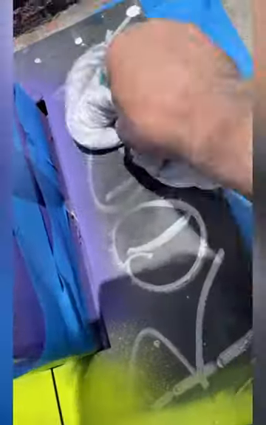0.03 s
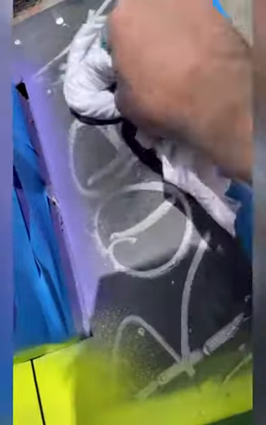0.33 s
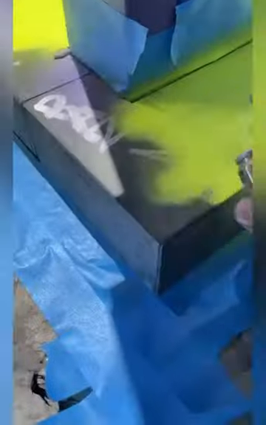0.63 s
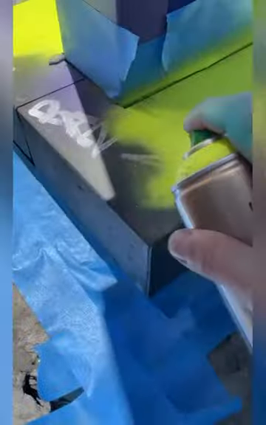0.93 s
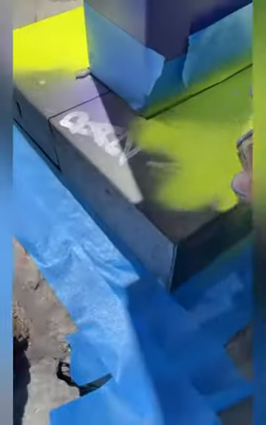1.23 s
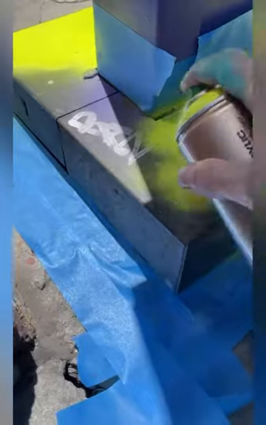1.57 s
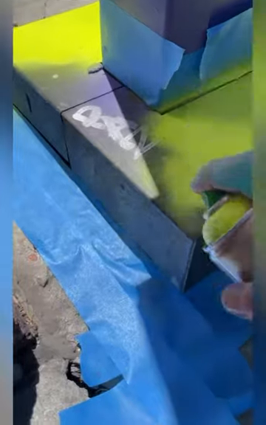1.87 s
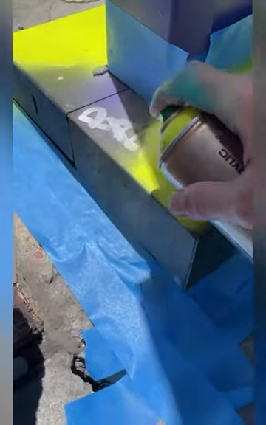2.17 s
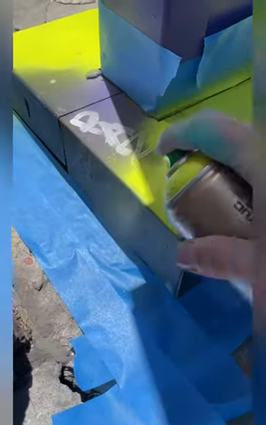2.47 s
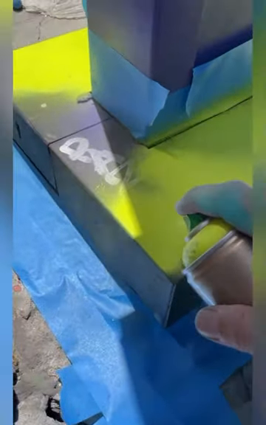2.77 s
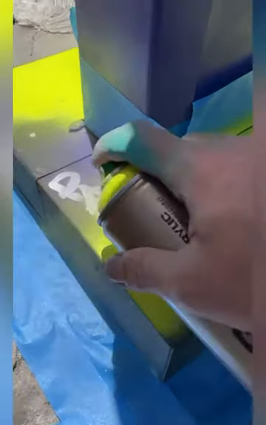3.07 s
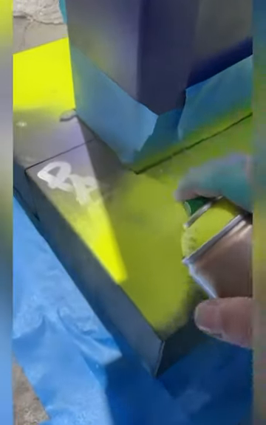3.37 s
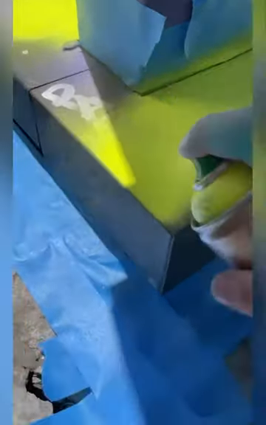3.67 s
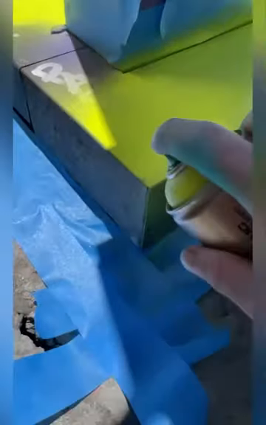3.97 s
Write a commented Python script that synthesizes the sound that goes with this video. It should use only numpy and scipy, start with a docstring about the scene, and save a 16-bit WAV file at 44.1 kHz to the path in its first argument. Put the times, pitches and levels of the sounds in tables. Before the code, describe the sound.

After a short moment of loud low hum, wind and cloth rubbing, an abrupt cut leads to the main sound: close, pulsing spray paint hiss. The nozzle clicks now and then while gusts thump the microphone over faint traffic.

```python
"""A spray can sweeps back and forth close to a phone outdoors, about four strokes a second: its jet
hisses, dips at every turn and swirls off nearby surfaces, and its nozzle clicks now and then.
Gusts buffet the microphone over a distant street wash. Before the spray, for just over half a
second, a rag wipes a painted ledge under a loud low drone and wind, ending on a hard cut."""
import sys
import numpy as np
from scipy import signal
from scipy.fft import rfft, irfft
from scipy.io import wavfile
from scipy.ndimage import map_coordinates

SR = 44100
rng = np.random.default_rng(int(sys.argv[2]) if len(sys.argv) > 2 else 0)


def transcribe(signal):
    """Save signal, clipped to [-1, 1], as a 16-bit WAV file at the path in sys.argv[1]."""
    frames = np.atleast_2d(signal).T
    limited = np.clip(frames, -1, 1)
    pcm = np.round(limited * 32767).astype(np.int16)
    wavfile.write(sys.argv[1], SR, pcm)


N = 176400
T = np.arange(N) / SR
FREQS = np.maximum(np.arange(N // 2 + 1) * SR / N, 1)

# spray strokes (start [s], end [s], level [dB], sag [dB], fan trim [dB], hiss left at the turn [dB])
SPRAY_STROKES = [(0.585, 0.706, -28, 2.5, -0.5, -65), (0.803, 0.818, -36, 3, 4, -45),
                 (0.821, 1.02, -27, 8.5, 2, -34), (1.039, 1.223, -26.5, 9.5, 3, -44),
                 (1.258, 1.436, -28.5, 6, 2, -39), (1.465, 1.61, -27, 7, 1, -36.5),
                 (1.65, 1.847, -29, 2.5, 1, -40), (1.888, 2.099, -25.5, 7, 0, -30),
                 (2.119, 2.315, -24, 9.5, -1, -38), (2.36, 2.526, -26, 4.5, -0.5, -38.5),
                 (2.594, 2.765, -26, 6, 0, -41), (2.828, 3.03, -26, 9, 0, -32.5),
                 (3.074, 3.278, -26, 6.5, -0.5, -37), (3.33, 3.497, -27.5, 3.5, 0, -42),
                 (3.563, 3.725, -29, 2.5, 2.5, -37), (3.762, 3.962, -24.5, 6, 1, -34)]
# bright hiss of the jet (frequency [Hz], gain [dB])
JET_EQ = [(3000, -27), (6500, -30), (8000, -7), (9000, -0.5), (10000, -1.5), (11500, 0.5), (13200, 0.3),
          (14200, -1.5), (15200, 0.3), (16000, -2)]
# lower hiss of the paint fan (frequency [Hz], gain [dB])
FAN_EQ = [(600, -24), (1200, -1), (1900, -3), (2270, 0), (2600, -10.5), (4300, -9), (4850, -19), (5200, -5),
          (6800, -3.5), (8000, 5), (9500, -36), (14000, -7.5)]
# spurts of paint (time [s], half length [s], level [dB], centre [Hz])
PAINT_SPURTS = [(.828, 0.0058, -30.5, 8700), (1.482, 0.01, -39, 8300), (2.65, 0.023, -39, 8800),
                (2.88, 0.01, -30, 10100), (3.045, 0.019, -50.5, 4660), (3.636, 0.062, -34.5, 8450)]
# reflections off the hand, ledge and post (delay [ms], swing as the can moves [ms], gain [dB])
EARLY_REFLECTIONS = [(.45, .1, -13), (.88, .09, -10), (1.5, .25, -14), (2.4, .35, -16)]
# nozzle clicks (time [s], level [dB], treble trim [dB])
NOZZLE_CLICKS = [(0.8024, -35, -11), (1.463, -30, -6), (1.649, -27, -9), (1.885, -37, -8),
                 (2.235, -30.5, 0), (2.597, -29, -1), (2.788, -12.5, -1.5), (2.826, -23, 0),
                 (3.766, -19, -5.5)]
# tone of the plastic cap (frequency [Hz], gain [dB])
NOZZLE_EQ = [(500, -28), (1250, -3.5), (2200, -7), (3200, -2), (4600, -5), (5250, 5.5), (6400, 2),
             (8000, 5), (13000, 3), (16000, 3.5)]
# lead of the left microphone port for close sounds (frequency [Hz], phase [rad])
PORT_PHASE = [(2400, 0), (2930, 1.8), (3700, .2), (4500, .2), (4850, -1.5), (5400, -.1), (6400, .5),
              (8000, 2.05), (8900, 2.5), (9350, 3.1), (10550, 3.18), (11000, 3.5), (11800, 4),
              (13000, 4.75), (14700, 6.28)]

# fader ride of the drone (time [s], level [dB])
DRONE_RIDE = [(0, -10), (.04, -16.5), (.065, -6.5), (.12, -8.5), (.16, -7), (.24, -10), (.29, -14.5),
              (.325, -11), (.37, -23), (.405, -10), (.455, -14), (.5, -8), (.545, -11.5), (.575, -12.5)]
# partials of the drone (harmonic [number], gain [dB])
DRONE_PARTIALS = [(1, 1.5), (2, -14), (3, -16), (5, -35)]
# swelling overtones (time [s], half length [s], level [dB], harmonic [number])
OVERTONE_FLARES = [(0.106, 0.016, -17, 3), (0.374, 0.023, -15, 2), (0.541, 0.007, -12, 2)]
# wind blast under the drone (frequency [Hz], gain [dB])
BLAST_EQ = [(25, -34), (43, -14.5), (70, -9), (102, 1), (145, -5), (210, -6), (300, -12.5), (400, -18.5),
            (600, -24), (1000, -23.5), (1600, -38.5), (3200, -47), (8000, -59), (16000, -101.5)]
# fader ride of the blast (time [s], level [dB])
BLAST_RIDE = [(0, -12.5), (.12, -12.5), (.3, -14), (.45, -15.5), (.575, -13)]
# stereo image of the blast (frequency [Hz], correlation [0-1])
BLAST_IMAGE = [(100, .99), (380, 0.92), (700, 0.2), (2400, 0), (8000, 0)]

# wipes of the rag (time [s], half length [s], level [dB])
RAG_WIPES = [(.04, 0.094, -35.5), (.32, 0.077, -36.5), (.5, 0.04, -48.5)]
# cloth rubbing on paint (frequency [Hz], gain [dB])
RAG_EQ = [(500, 9.5), (1100, -0.5), (1600, 11.5), (2200, 4), (2600, 6), (3200, -2.5), (3800, 2.5),
          (4800, -5), (5800, 0.5), (7000, -2), (9000, -2), (12500, -0.5), (16000, -9)]
# bands where the pressed rag sings (centre [Hz], width [Hz], gain [dB])
SCRUB_BANDS = [(2143, 220, -0.5), (4000, 450, -13)]
# pressing the rag down (time [s], half length [s], level [dB])
RAG_PRESS = [(.44, .085, -40.5)]

# gusts on the microphone (time [s], level [dB])
GUST_RIDE = [(.58, -26.5), (.63, -17), (.72, -16.5), (.785, -22), (.805, -13), (.83, -22.5), (.97, -21.5),
             (1.06, -21), (1.145, -29.5), (1.172, -13), (1.195, -18.5), (1.27, -16), (1.35, -20.5),
             (1.42, -25.5), (1.52, -31), (1.6, -31), (1.76, -39.5), (1.87, -24.5), (1.93, -35), (2.0, -22),
             (2.075, -24.5), (2.125, -31.5), (2.2, -21.5), (2.24, -29.5), (2.5, -45.5), (2.85, -36),
             (2.99, -32.5), (3.08, -34.5), (3.6, -45), (4, -35)]
# low thump of the gusts (frequency [Hz], gain [dB])
BUFFET_EQ = [(20, -50), (40, -0.5), (65, 1.5), (125, 3.5), (170, -0.5), (240, -1), (285, -5), (335, -15.5),
             (500, -21.5), (1000, -28.5), (3000, -67)]
# the fastest gusts tearing into eddies (time [s], half length [s], level [dB])
EDDY_BURSTS = [(.702, 0.022, -23.5), (1.172, 0.0053, -31.5), (1.246, 0.0045, -15), (1.28, 0.019, -24),
               (1.335, 0.037, -20.5), (2.0, 0.032, -34), (2.072, 0.0067, -28.5), (2.2, 0.011, -27)]
# low-mid flap of the eddies (frequency [Hz], gain [dB])
EDDY_EQ = [(120, -56), (240, 5), (330, 8), (480, 1.5), (700, -14), (1200, -23), (2500, -47), (6000, -69)]

# wash of far traffic (frequency [Hz], gain [dB])
STREET_EQ = [(30, -16), (70, 5.5), (150, 2), (300, 2), (480, 2.5), (800, 3), (1200, 0.5), (1800, -7.5),
             (2500, -15), (4000, -16.5), (8000, -24), (16000, -123)]
# stereo image of the wash (frequency [Hz], correlation [0-1])
STREET_IMAGE = [(60, 0.77), (290, 1), (640, 0), (1400, 0.47), (3000, 0.31), (8000, 0.65)]
# pan of the wash (frequency [Hz], left over right [dB])
STREET_PAN = [(400, 1.5), (750, -0.5), (1150, 3), (1600, 1), (2300, 0.5)]
# street rumble (frequency [Hz], gain [dB])
RUMBLE_EQ = [(60, -4), (120, -4), (170, -1), (270, -1.5), (380, -16), (600, -33.5), (1500, -82)]
# fader ride of the rumble (time [s], level [dB])
RUMBLE_RIDE = [(.6, -39), (2.3, -45), (2.6, -43.5), (2.95, -32.5), (3.3, -33.5), (3.55, -33.5),
               (3.9, -30.5)]

CUT_S = 0.5755
ATTACK_S, RELEASE_S = 0.011, 0.02
SWELL_DB, SWELL_S = 2, 0.026  # a stroke starts this far down and swells as the hand gets moving
JET_CORRELATION, FAN_CORRELATION, FAN_DB = .9995, .95, -11.5
WANDER_DB, WANDER_HZ, FLUTTER_DB, SPUTTER = 2.3, 11, .5, 0.16
CLICK_DECAY_S, CLICK_TAIL_S, CLICK_TAIL_DB, CLICK_TREBLE_HZ = 0.0015, 0.009, -23, 3500
DRONE_HZ, DRONE_JITTER, DRONE_WAVER_DB = 96.55, .03, 2.2
RAG_GRAIN_DB, STREET_DB = 0.5, -37.5
LOW_CUT_HZ, HIGH_CUT_HZ = 32, 15720


def spray():
    """Each stroke opens fast, swells, sags and drops to a weak hiss; droplets roughen the jet."""
    jet_power = fan_power = 0
    next_starts = [row[0] for row in SPRAY_STROKES[1:]] + [N / SR]
    for (start, end, db, sag_db, fan_db, turn_db), until in zip(SPRAY_STROKES, next_starts):
        attack = np.clip((T - start) / ATTACK_S + .5, 0, 1)
        onset_dip_db = SWELL_DB * np.exp(-np.maximum(T - start, 0) / SWELL_S)
        progress = np.clip((T - start) / (end - start), 0, 1)
        release = np.exp(-np.maximum(T - end, 0) / RELEASE_S)
        stroke = attack * undb(db - onset_dip_db - sag_db * progress) * release
        power = stroke ** 2 + (T > end) * (T < until) * undb(turn_db) ** 2
        jet_power += power
        fan_power += power * undb(fan_db) ** 2
    jet = np.sqrt(jet_power) * colour(noise(JET_CORRELATION), JET_EQ)
    fan = undb(FAN_DB) * np.sqrt(fan_power) * colour(noise(FAN_CORRELATION), FAN_EQ)
    hiss = jet_wander(jet + fan + spurts())
    return reflections(hiss * undb(FLUTTER_DB * walk(56)) * (1 + SPUTTER * walk(1200)))


def spurts():
    """Surges of paint, each briefly lifting one band of the hiss."""
    return sum(noise_band(hz, hz / 4, JET_CORRELATION) * swells([(at, half, db)])
               for at, half, db, hz in PAINT_SPURTS)


def jet_wander(hiss):
    """Neighbouring bands of the hiss rise and fall on their own as the jet turns."""
    spectrum = rfft(hiss)
    centres, spacing = np.linspace(0, 16000, 26, retstep=True)
    bands = (irfft(spectrum * np.maximum(1 - abs(FREQS - hz) / spacing, 0), N) for hz in centres)
    return sum(band * undb(WANDER_DB * walk(WANDER_HZ)) for band in bands)


def reflections(hiss):
    """Near surfaces echo the hiss; their delays slide as the can moves, so it swirls."""
    heard = hiss
    for delay_ms, swing_ms, db in EARLY_REFLECTIONS:
        playhead = np.arange(N) - (delay_ms + swing_ms * walk(3)) * SR / 1000
        echo = np.array([map_coordinates(side, [playhead], order=3, mode="mirror") for side in hiss])
        heard = heard + undb(db) * echo
    return heard


def nozzle():
    """The plastic cap snaps and spits: a sharp tick with a short tail, some duller than others."""
    clicks = 0
    for at, db, treble_db in NOZZLE_CLICKS:
        age = np.maximum(T - at, 0)
        snap = np.exp(-age / CLICK_DECAY_S)
        tail = undb(CLICK_TAIL_DB) * np.exp(-age / CLICK_TAIL_S)
        envelope = (T >= at) * undb(db) * (snap + tail)
        eq = [(hz, gain + treble_db * (hz > CLICK_TREBLE_HZ)) for hz, gain in NOZZLE_EQ]
        clicks += colour(noise(1.0) * envelope, eq)
    return clicks


def drone():
    """A wavering, motor-like low hum; now and then an overtone takes over."""
    cycles = np.cumsum(DRONE_HZ * (1 + DRONE_JITTER * walk(29))) / SR
    phase = 2 * np.pi * (cycles - cycles[int(CUT_S * SR)])  # crests on the cut, so the cut clicks
    hum = sum(undb(db + DRONE_WAVER_DB * walk(28)) * np.cos(round(harmonic) * phase)
              for harmonic, db in DRONE_PARTIALS)
    flares = sum(swells([(at, half, db)]) * np.cos(round(harmonic) * phase)
                 for at, half, db, harmonic in OVERTONE_FLARES)
    return np.sqrt(2) * (hum * undb(curve(DRONE_RIDE)) + flares)


def wind_blast():
    """Rough wind under the drone, centred in the bass and wide on top."""
    return colour(noise(across(BLAST_IMAGE)), BLAST_EQ) * undb(curve(BLAST_RIDE) + 0.56 * walk(75))


def rag():
    """Cloth rubs over the ledge and catches on the grain; pressed down, it sings in narrow bands."""
    rub = colour(noise(1.0), RAG_EQ) * swells(RAG_WIPES)
    scrub = sum(noise_band(hz, width_hz, 1.0) * undb(db) for hz, width_hz, db in SCRUB_BANDS)
    grain = undb(1.1 * walk(80) + RAG_GRAIN_DB * walk(700))
    return (rub + scrub * swells(RAG_PRESS)) * grain


def gusts():
    """Gusts thump the microphone; the fastest tear into eddies that flap higher up."""
    buffet = colour(noise(0.99), BUFFET_EQ) * undb(curve(GUST_RIDE) + 1.8 * walk(31))
    eddies = colour(noise(0.98), EDDY_EQ) * swells(EDDY_BURSTS) * undb(4.6 * walk(90))
    return buffet + eddies


def street():
    """A wide bed of far traffic, a little to the left, over a rumble that builds late."""
    wash = colour(noise(across(STREET_IMAGE)), STREET_EQ) * undb(STREET_DB + 0.56 * walk(12))
    pan = undb(across(STREET_PAN) * np.array([[.5], [-.5]]))
    rumble = colour(noise(0.73), RUMBLE_EQ) * undb(curve(RUMBLE_RIDE))
    return irfft(rfft(wash) * pan, N) + rumble


def mic_ports(x):
    """Close sound reaches the two microphone ports out of step; near 10 kHz they are opposed."""
    return irfft(rfft(x) * np.exp(1j * across(PORT_PHASE) * np.array([[.5], [-.5]])), N)


def undb(db):
    """Decibels to linear gain."""
    return 10 ** (np.asarray(db) / 20)


def curve(rows):
    """Automation drawn in straight lines over time."""
    return np.interp(T, *np.array(rows).T)


def across(rows):
    """A table read at every frequency, on a log axis."""
    hz, value = np.array(rows).T
    return np.interp(np.log(FREQS), np.log(hz), value)


def swells(rows):
    """Bell-shaped rises and falls, as a gain."""
    return sum(undb(db) * np.exp(-((T - at) / half) ** 2 / 2) for at, half, db in rows)


def walk(rate_hz):
    """Smooth random modulation with spread 1."""
    drift = irfft(rfft(rng.standard_normal(N)) * np.exp(-(FREQS / rate_hz) ** 2), N)
    return drift / drift.std()


def noise(correlation):
    """Stereo white noise, from wide (0) to mono (1)."""
    shared = np.clip(correlation, 0, 1)
    mid, side = rfft(rng.standard_normal((2, N)))
    return irfft(mid * np.sqrt((1 + shared) / 2) + np.array([[1], [-1]]) * side * np.sqrt((1 - shared) / 2), N)


def noise_band(hz, width_hz, correlation):
    """Noise in one steep-sided band."""
    eq = [(hz + width_hz * offset, db) for offset, db in [(-1.5, -40), (-.5, 0), (.5, 0), (1.5, -40)]]
    return colour(noise(correlation), eq)


def colour(x, eq):
    """EQ with make-up gain, so white noise keeps its level."""
    gain = undb(across(eq))
    return irfft(rfft(x) * gain / np.sqrt(np.mean(gain ** 2)), N)


def scene():
    """Drone, wind and rag, then a hard cut to the spray can, gusts and street."""
    wiping = drone() + wind_blast() + mic_ports(rag())
    spraying = mic_ports(spray() + nozzle()) + gusts() + street()
    return np.where(T < CUT_S, wiping, spraying)


def record(dry):
    """The phone thins the deepest bass, rounds the loudest peaks and cuts the top."""
    padded_hz = np.arange(N + 1) * SR / (2 * N)
    low_cut = np.interp(padded_hz, [LOW_CUT_HZ / 2, LOW_CUT_HZ * 1.7], [0, 1])
    thinned = irfft(rfft(dry, 2 * N) * low_cut)[:, :N]
    rounded = thinned / (1 + (thinned / .92) ** 6) ** (1 / 6)
    high_cut = signal.ellip(10, .2, 70, HIGH_CUT_HZ, fs=SR, output="sos")
    return signal.sosfilt(high_cut, rounded)


dry = scene()
out = record(dry)
transcribe(out)
```